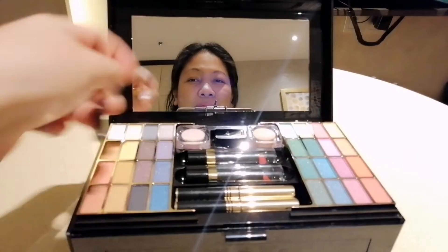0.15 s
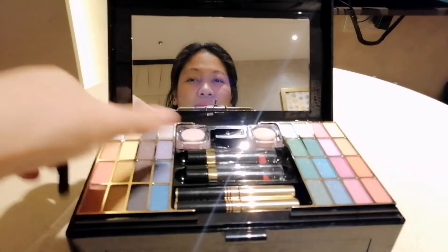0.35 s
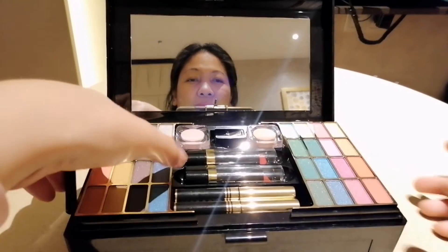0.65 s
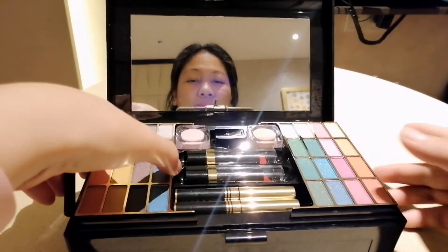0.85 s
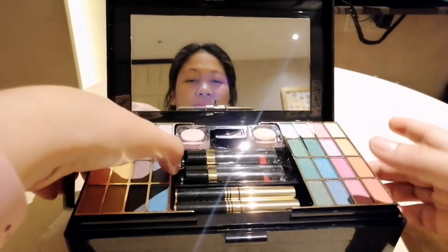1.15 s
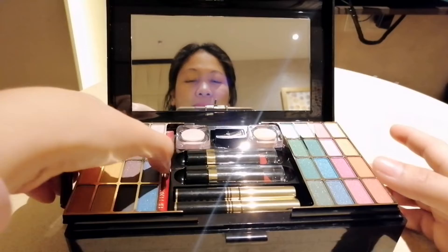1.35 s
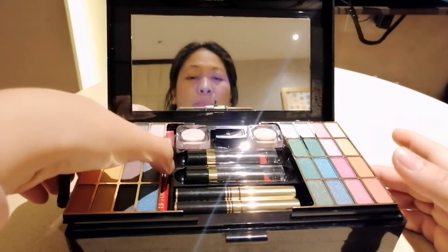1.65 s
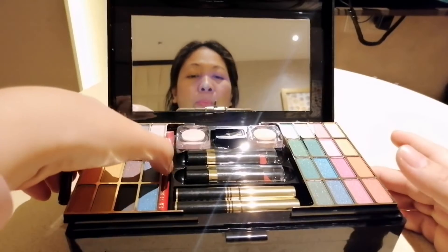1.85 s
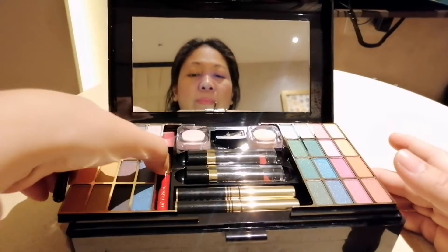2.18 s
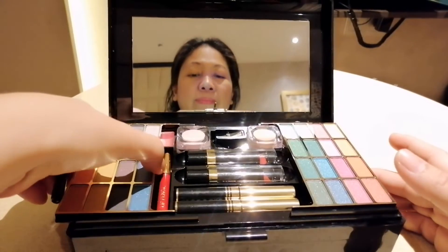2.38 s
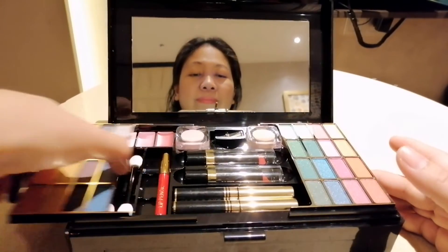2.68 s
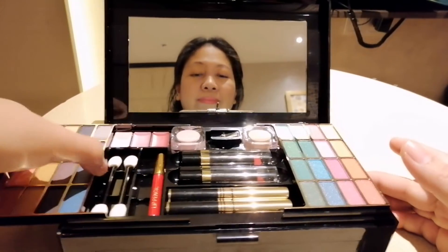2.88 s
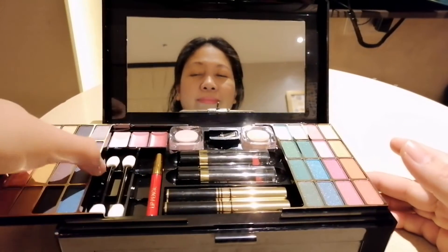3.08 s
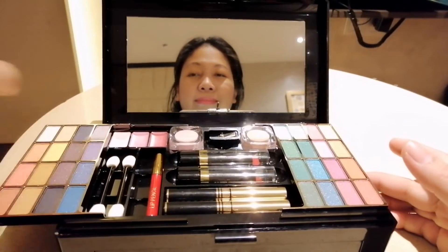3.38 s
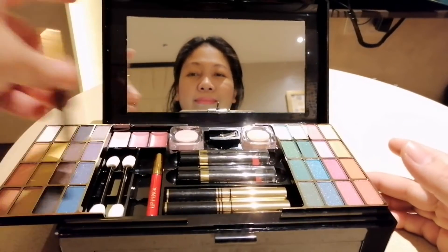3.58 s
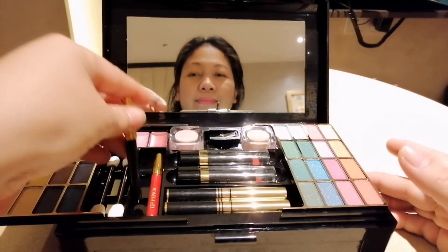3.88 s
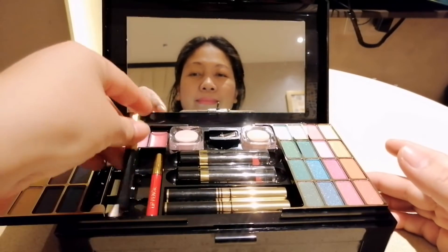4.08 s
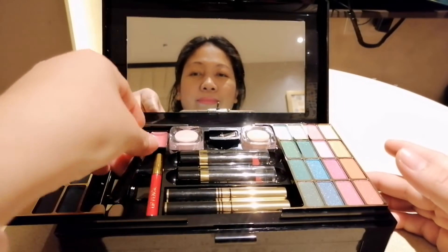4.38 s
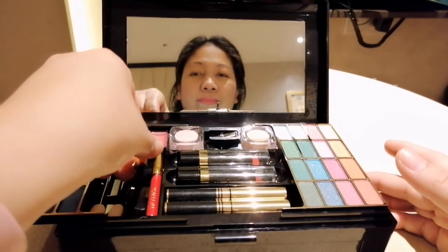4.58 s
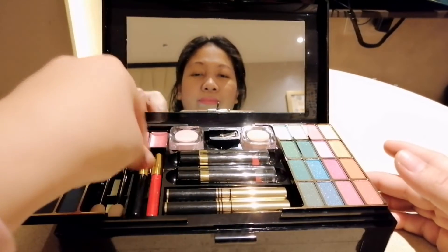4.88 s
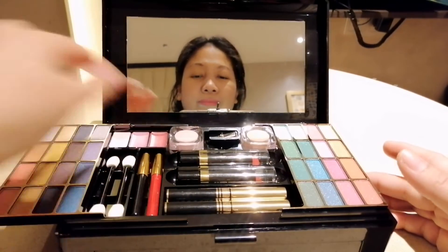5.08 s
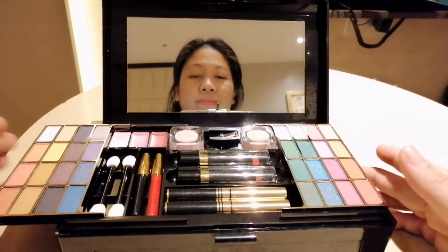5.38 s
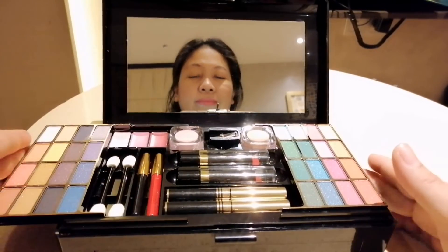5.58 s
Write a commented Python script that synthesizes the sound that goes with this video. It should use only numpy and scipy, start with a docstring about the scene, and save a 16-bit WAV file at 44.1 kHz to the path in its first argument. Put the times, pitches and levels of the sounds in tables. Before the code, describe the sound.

Close stereo sound of a plastic makeup case handled on a table in a quiet room. A faint finger brush comes first, then small ticks and clicks. A tray scrapes and slides out, hitting its stop with a hard clack and brief rattle. After a pause, light taps lead to a fast cluster of loud snaps as a pencil is seated. Low ventilation rumbles underneath.

```python
"""A quiet room, where small cosmetics are handled in a plastic makeup case on a table, close to two microphones.
A tray creeps and ticks, slides out and hits its stop; a pencil is tapped and snapped into its slot.
Knocks are bursts of tiny bounces that ring the plastic; brushing and sliding are grainy, coloured noise.
The room answers with a short tail of noise, over a low ventilation rumble with hum and hiss."""
import sys
import numpy as np
from scipy import signal
from scipy.io import wavfile
from scipy.ndimage import uniform_filter1d

SR = 44100
rng = np.random.default_rng(int(sys.argv[2]) if len(sys.argv) > 2 else 0)


def invert_db(x):
    """Field ratio 10**(x/20) for x, a level in decibels (scalar or array-like)."""
    u = np.asarray(x, float) / 20
    return 10 ** u


def transcribe(signal):
    """Save signal, clipped to [-1, 1], as a 16-bit WAV file at the path in sys.argv[1]."""
    frames = np.atleast_2d(signal).T
    limited = np.clip(frames, -1, 1)
    pcm = np.round(limited * 32767).astype(np.int16)
    wavfile.write(sys.argv[1], SR, pcm)


N = 253134  # length in samples

# What the plastic case rings with, before each knock reshapes it.
# Each row: pitch in Hz, relative level in dB, time to fade by 60 dB in seconds.
CASE_MODES = [(283, -8, 0.069), (427, -11.5, 0.026), (530, 0.5, 0.014), (643, -10.5, 0.03), (750, -2, .04),
              (908, -3, 0.027), (1129, -4.5, 0.042), (1224, 3.5, 0.017), (1518, 0.5, 0.021),
              (1630, -3, 0.0065), (1938, 0.5, .018), (2270, -3, 0.036), (2600, -4, 0.029), (2903, 0, 0.026),
              (3328, -0.5, 0.02), (4080, -3, 0.0013), (4605, -8, 0.011), (5250, -5, 0.016),
              (5500, -10, 0.0073), (6146, -4, 0.0076), (6930, -2.5, 0.01), (7740, -3.5, 0.0039),
              (8300, -2.5, 0.0059), (9800, -9.5, 0.013), (9990, -6.5, 0.0054), (11850, -12.5, 0.004),
              (12700, -22, .003), (14900, -17, .003)]


def evened(x):
    """Scales to rms 1."""
    return x / np.sqrt(np.mean(x ** 2) + 1e-20)


def read(points, hz):
    """Reads a table along log frequency."""
    f, value = np.transpose(points)
    return np.interp(np.log(hz + 1), np.log(f + 1), value)


def curve(rows):
    """Draws straight lines between the rows of a timed table, giving each column at every sample."""
    s, *columns = np.transpose(rows)
    return [np.interp(np.arange(N) / SR, s, c) for c in columns]


def panned(pan_db):
    """Left and right gains that differ by pan_db; positive leans left."""
    return invert_db([[pan_db / 2], [-pan_db / 2]])


def stereo_spectrum(same, hz, a, b, c, d):
    """Two random spectra; the right one shares as much of the left as the likeness table says."""
    same = np.clip(read(same, hz), -1, 1)[:, None]
    left = a + 1j * b
    right = same * left + np.sqrt(1 - same ** 2) * (c + 1j * d)
    return np.array([left, right])


def noise(colour, same, patchy_db, size=1024):
    """Stereo noise of a given colour and likeness, with drifting louder and softer patches."""
    frames, hz = 4 * N // size + 5, np.fft.rfftfreq(size, 1 / SR)
    a, b, c, d, patches = rng.standard_normal((frames, len(hz), 5)).T
    patches = uniform_filter1d(patches, size=10, axis=0)
    patches = evened(uniform_filter1d(patches, size=10, axis=1))
    spectrum = stereo_spectrum(same, hz, a, b, c, d)
    spectrum *= invert_db(read(colour, hz)[:, None] + patchy_db * patches)
    return evened(signal.istft(spectrum, nperseg=size, noverlap=3 * size // 4)[1][:, :N])


def resonate(x, hz, width_hz):
    """A resonance of gain 1 that follows the curve hz: shift down to zero, smooth, shift back."""
    turn = np.exp(2j * np.pi * np.cumsum(hz * np.ones(N)) / SR)
    r = np.exp(-np.pi * width_hz / SR)
    return 2 * (turn * signal.lfilter([1 - r], [1, -r], x / turn)).real


def bass_of(x, top_hz):
    """The part of x under top_hz."""
    return signal.sosfiltfilt(signal.butter(2, top_hz, fs=SR, output="sos"), x)


def strokes(rows):
    """Gain of strokes that each rise, hold and fall in straight lines of dB."""
    t = np.arange(N) / SR
    total = 0
    for s, hold, db, rise, fall in rows:
        before, after = np.maximum(s - t, 0), np.maximum(t - s - hold, 0)
        total = total + invert_db(db - rise * before - fall * after)
    return total


def air():
    """Ventilation rumble and hiss are shaped noise; the fuzzy hum is noise through a narrow resonance."""
    # Colour of rumble and hiss. Each row: frequency in Hz, relative level in dB per Hz.
    air_colour = [(12, -24.5), (20, 1), (95, -6.5), (126, -10.5), (180, -9.5), (274, -13.5), (452, -22),
                  (880, -26), (2400, -31), (3850, -38.5), (6500, -39), (11000, -40.5), (14800, -38),
                  (16500, -45)]
    # Each row: frequency in Hz, likeness of left and right (-1 to 1).
    air_same = [(60, 0.64), (180, 0.55), (550, 0.066), (1650, -0.27), (4970, 0.26), (15000, -0.42)]
    # The hum. Each row: pitch in Hz, width in Hz, level in dB before the rumble drifts.
    fan = [(90.4, 14, -66.5)]
    # Slow drift of the rumble. Each row: time in seconds, gain in dB.
    rumble = [(0, 2), (3.8, 1.7), (4.6, -0.5), (5.74, -3)]
    air_db = -59.5  # before the rumble drifts
    hum = sum(invert_db(db) * evened(resonate(rng.standard_normal(N), hz, width)) for hz, width, db in fan)
    bed = invert_db(air_db) * noise(air_colour, air_same, patchy_db=2.0, size=4096) + hum
    return bed + (invert_db(curve(rumble)[0]) - 1) * bass_of(bed, top_hz=200)


def room(x):
    """Each band stores the power sent out in all directions, loses it at its own speed and sounds as noise."""
    # How long the tail lasts. Each row: frequency in Hz, time to fade by 60 dB in seconds.
    fade_times = [(250, 0.22), (700, 0.25), (1400, 0.37), (3000, 0.33), (6000, 0.3), (12000, 0.17)]
    # Each row: frequency in Hz, likeness of left and right in the tail.
    tail_same = [(250, .9), (700, 0.7), (1500, 0.15), (4000, 0.037)]
    hop_s, first_s = 64 / SR, 0.0018  # frame step; build-up time of the answer
    hz, t, z = signal.stft(x, SR, nperseg=256, noverlap=192)
    # all directions together smooth the colour
    power = uniform_filter1d((abs(z) ** 2).mean(0), size=5, axis=0)
    keep = invert_db(-120 * hop_s / read(fade_times, hz))  # power kept per step
    fill = np.exp(-hop_s / first_s)
    stored = np.array([signal.lfilter([0, 1 - k], [1, -k], p) for k, p in zip(keep, power)])
    stored = signal.lfilter([0, 1 - fill], [1, -fill], stored)  # walls answer after a short gap
    a, b, c, d = rng.standard_normal((len(t), len(hz), 4)).T
    field = stereo_spectrum(tail_same, hz, a, b, c, d) * np.sqrt(abs(stored))
    return signal.istft(field, nperseg=256, noverlap=192)[1][:, :N]


def dull_rub():
    """A dull, low rub, such as the tray creeping in the case: noise through a wide low resonance, twice."""
    # Each row: full at seconds, hold in seconds, level in dB, rise and fall in dB per second.
    rub_strokes = [(2.0, 0.0074, -60.5, 52, 75.15), (5.25, 0.095, -74, 60, 70)]
    # Centre of the resonance. Each row: time in seconds, frequency in Hz.
    rub_hz = [(2.2, 515), (5.0, 292)]
    hz = curve(rub_hz)[0]
    shared = rng.standard_normal((2, N)) + 0.5 * rng.standard_normal(N)
    once = resonate(shared, hz, width_hz=260)
    return strokes(rub_strokes) * evened(resonate(once, hz, width_hz=290))


def friction(rows, span_s, colour, pan_db, grain_db):
    """Rubbing: coloured noise, grainy in level, while the contact lasts."""
    t = np.arange(N) / SR
    stroke = strokes(rows) * (t > span_s[0]) * (t < span_s[1])
    grain = invert_db(grain_db * evened(uniform_filter1d(rng.standard_normal(N), size=120)))
    likeness = [(500, .8), (3000, .2)]  # Hz, left-right likeness
    rub = evened(noise(colour, likeness, patchy_db=5.0) * grain)
    return rub * uniform_filter1d(stroke, size=200) * panned(pan_db)  # stroke edges are softened


def brush():
    """Fingers brush skin and plastic: short strokes of grainy friction noise."""
    # Each row: full at seconds, hold in seconds, level before softening in dB, rise and fall in dB per second.
    brush_strokes = [(.26, 0.018, -58.5, 577, 670), (.415, 0.0036, -69, 65, 192),
                     (.47, 0.18, -80.5, 300, 24.9)]
    # Each row: frequency in Hz, relative level in dB per Hz.
    brush_colour = [(1470, -54), (2500, -18), (3490, -9.5), (3760, -36), (3880, -26), (5110, -5.5),
                    (6230, -9), (6960, 4.5), (7730, -6), (12000, -19.5), (15600, -35), (22000, -120)]
    # Start and end of the contact in seconds.
    brush_span = (.18, 1)
    return friction(brush_strokes, brush_span, brush_colour, pan_db=-11.5, grain_db=-1.5)


def tray():
    """The tray moves out: a bright slide and a low scrape, both friction noise."""
    # Both strokes. Each row: full at seconds, hold in seconds, level before softening in dB,
    # rise and fall in dB per second.
    slide, scrape = [(2.83, .075, -57, 84, 499)], [(2.68, .19, -64.5, 600, 80)]
    # Both colours. Each row: frequency in Hz, relative level in dB per Hz.
    slide_colour, scrape_colour = [(2470, -36), (4200, -19), (5280, -0.5), (5850, -4), (6490, 3.5),
                                   (7580, -5), (8680, -1.5), (11000, -20), (14500, -22.5)], [(290, -22.5), (500, -1), (557, -34.5), (768, 2),
                                                         (828, -4), (884, -6.5), (1440, -2.5), (2000, -7.5),
                                                         (2400, 2.5), (3600, -13.5), (4680, -56),
                                                         (7920, -120)]
    # Start and end of the contact in seconds.
    tray_span = (2.65, 2.928)
    sliding = friction(slide, tray_span, slide_colour, pan_db=-3.5, grain_db=1.5)
    return sliding + friction(scrape, tray_span, scrape_colour, pan_db=-1.0, grain_db=2.0)


def rattles():
    """Loose items rattle on after a jolt: rows of small fading knocks at uneven gaps, on chance spots."""
    # Each row: start in seconds, length in seconds, first level in dB before chance, fade in dB per second,
    # deepest favoured pitch in Hz.
    jolts = [(2.955, .065, -26.5, 198.5, 705.5), (4.814, .155, -31.5, 24.5, 1162)]
    gap_s, spread_db, octaves = .009, 1.5, 1.5  # mean gap, chance in level, span of pitches
    high_db, chatter_ms = 0.5, 3  # mean level of the high modes, fade time of the bounces
    rows = []
    for start, length, first_db, fade_db, deepest_hz in jolts:
        gap, size, spot, bright = rng.random((30, 4)).T
        after = gap_s * np.cumsum(.5 + gap) - gap_s
        for a, u, v, b in zip(after, size, spot, bright):
            if a < length:
                middle_db = first_db - fade_db * a + spread_db * (2 * u - 1)
                bright_db = high_db + 2 * spread_db * (2 * b - 1)
                rows.append((start + a, middle_db, bright_db, deepest_hz * 2 ** (octaves * v), chatter_ms))
    return rows


def bounce_train(bounces, chatter_ms):
    """A contact chatters: chance bounces grow, die away and surround one firm hit as the part seats."""
    bounce_db, seat_ms = 3.5, 1.2
    t = np.arange(len(bounces)) / SR
    dying = np.exp(-t / max(chatter_ms / 1000, 1e-4))
    chatter = np.sign(bounces) * invert_db(bounce_db * abs(bounces)) * dying
    chatter *= abs(bounces) > 1.2  # only the stronger draws touch
    chatter *= np.minimum(t * 1000 / seat_ms, 1)  # the contact grows until the part seats
    chatter[int(seat_ms * SR / 1000)] = invert_db(bounce_db * 3.33)
    return chatter


def knock(row, luck, bounces):
    """One contact: tiny bounces ring the modes, each as strongly as the struck spot allows."""
    # Where the working hand is. Each row: time in seconds, left-right difference in dB,
    # microseconds by which the left microphone leads.
    hand = [(.5, 0, 203), (1.2, -6, 105), (1.4, 2.5, 133), (1.65, 1, 21), (2.25, 1, 116), (2.9, 8.5, 117),
            (4.1, 0, 130), (4.8, 1.5, 123), (5.65, 1, 80)]
    # A spot that favours a deep mode also moves the other low modes.
    # Each row: favoured pitch in Hz, relative level of the low modes in dB.
    weight = [(600, 4.5), (800, 9), (1100, 0), (1500, -8.5), (2500, -18.5), (5200, -5.5), (7000, -8.5)]
    low_top_hz, high_foot_hz = 1300, 4000  # borders of the low, middle and high modes
    spot_db, detune, apart_hz = 1.5, .04, 3500  # chance in level, pitch and left-right phase
    favour_db, favour_width = 3.0, .12  # lift of the favoured modes, width in log frequency
    deep_db, reach, skirt_db = 8.5, 0.87, 3.0  # deep cut, its border in octaves, loss per octave
    full_ring_ms, shortest = 3.6, 0.47  # chatter that lets the case ring fully, least share of the ring

    s, middle_db, high_db, favoured_hz, chatter_ms = row
    low_db = read(weight, favoured_hz)
    hz, db, t60 = np.repeat(np.transpose(CASE_MODES), 2, axis=1)[:, :, None]  # plates ring in close pairs
    t = np.arange(2048) / SR
    hand_s, *place = np.transpose(hand)
    pan_db, lead_us = (np.interp(s, hand_s, column) for column in place)

    nearness = np.exp(-(np.log(hz / favoured_hz) / favour_width) ** 2)
    deep = np.minimum(np.log2(hz / low_top_hz) + reach, 0) * np.minimum(low_db, 0)
    db = db - deep_db / 10 * deep  # a light, bright contact hardly moves the deepest modes
    db = db - skirt_db * abs(np.log2(hz / favoured_hz))  # modes far from the favoured one answer less
    db = db + spot_db * luck[:, :1] + favour_db * nearness
    t60 = t60 * np.clip(chatter_ms / full_ring_ms, shortest, 1)  # a short, firm contact damps the ring
    # modes near the favoured pitch move onto it, the others go slightly off
    hz = hz * (favoured_hz / hz) ** nearness * (1 + detune * luck[:, 1:2] * (1 - nearness))

    # modes start up or down by chance, the favoured ones together
    flip = np.pi * (luck[:, 2:3] > 4 * nearness)
    # the microphones hear the knock a moment apart and see unlike phases of the higher modes
    apart = hz * (luck[:, 3:4] / apart_hz - 2 * np.pi * lead_us * 1e-6)
    phase = flip + np.array([0, 1])[:, None, None] * apart
    modes = invert_db(db - 60 * t / t60) * np.sin(2 * np.pi * hz * t + phase)
    modes *= 1 - np.exp(-t * hz)  # each mode builds up in about a cycle

    chatter = bounce_train(bounces, chatter_ms)
    low, high = hz[:, 0] < low_top_hz, hz[:, 0] > high_foot_hz
    out = 0
    for group, group_db in ((low, low_db), (~low & ~high, 0), (high, high_db)):
        ring = signal.fftconvolve(modes[:, group].sum(1), chatter[None], axes=1)
        out = out + invert_db(middle_db + group_db) * ring / abs(ring).max(1, keepdims=True)
    return out * panned(pan_db)


def knocks():
    """All ticks, taps, snaps, the tray's stop and the rattles, each as a knock on the ringing case."""
    # Each row: time in seconds, level of the middle modes in dB before panning,
    # level of the high modes relative to them in dB, favoured pitch in Hz, fade time of the bounces in ms.
    contacts = [(0.5743, -52.5, -16, 1020, 12), (0.6038, -45, -23, 1377, 7.6),
                (1.1757, -29.5, -8, 1590, 5.4), (1.1781, -35, 11.5, 900, 2.6), (1.3058, -33, -14, 1380, 12),
                (1.3133, -30.5, -0.5, 1300, 4), (1.3185, -25, -4, 1300, 5.5), (1.342, -36, 7, 600, 4.2),
                (1.3472, -33, 6.5, 1074, 4.5), (1.5941, -47.5, -8, 740, 5.5), (1.7, -42, -18, 2300, 2.6),
                (1.7346, -33, -9.5, 2800, 3.3), (2.2395, -31.5, -10, 5170, 4.6),
                (2.2439, -38, 15.5, 750, 2.9), (2.252, -38, 7, 6950, 3.3), (2.6543, -53.5, -12, 1000, 1.7),
                (2.6758, -54.5, 1, 727, 1.7), (2.9315, -15.5, -6, 2400, 3.2), (2.9408, -19, 1, 1017, 10.6),
                (3.029, -39, 8.5, 1060, 3), (4.0086, -45, 2.5, 5250, 1.6), (4.0324, -46, 9, 5250, 1.3),
                (4.0437, -52.5, 1, 900, 1.3), (4.0933, -55, 14.5, 5400, 4), (4.201, -52.5, -1.5, 1220, 5.5),
                (4.2112, -31.5, -0.5, 1550, 12), (4.229, -27.5, -10.5, 1529, 3),
                (4.7368, -25, -10, 1700, 3.1), (4.778, -20, -2, 1800, 0.68),
                (4.7999, -29.5, 20.5, 6850, 0.79), (4.8079, -14, 1, 2580, 1.3),
                (4.8296, -27, -2, 1600, 1.5), (4.843, -24.5, 6, 2706, 5.9), (4.8556, -23.5, 7, 5070, 1.6),
                (4.8596, -28, 10.5, 6550, 1.7), (4.893, -31, 15, 6200, 1.7),
                (4.9227, -36.5, 5.5, 5600, 1.3), (4.9089, -21, -1, 1550, 2.1),
                (4.9349, -19.5, 1, 2540, 1.5), (4.947, -29, -15, 1330, 0.95), (5.6402, -52, -9, 750, 3.1),
                (5.6765, -57, -4, 920, 2.5)]
    out = np.zeros((2, N + SR))
    rows = contacts + rattles()
    # per knock: 1024 draws for the bounces, then 4 for each of the paired modes
    luck = rng.standard_normal((len(contacts) + 60, len(CASE_MODES) * 8 + 1024))
    for row, draw in zip(rows, luck):
        sound = knock(row, draw[1024:].reshape(-1, 4), draw[:1024])
        out[:, round(row[0] * SR):][:, :sound.shape[1]] += sound
    return out[:, :N]


def scene():
    """Case sounds, their room tail, the dull rub and the air."""
    near = knocks() + tray() + brush()
    return near + invert_db(-8.0) * room(near) + dull_rub() + air()


def band_limit(x):
    """A steep low-pass at the top of the band."""
    return signal.sosfilt(signal.butter(12, 16530, fs=SR, output="sos"), x)


def record(dry):
    """An automatic low cut closes gradually while loud treble lasts."""
    treble_hz, knee_db = 6000, -46  # treble above this pitch and level closes the cut
    share, cut_hz = 2.3, 350  # dB of cut per dB of excess, top of the bass that is cut
    treble = dry - bass_of(bass_of(dry, treble_hz), treble_hz)
    treble_power = abs(uniform_filter1d((treble ** 2).mean(0), size=1500))
    treble_db = 10 * np.log10(treble_power + 1e-12)
    over_db = np.maximum(treble_db - knee_db, 0)
    over_db = uniform_filter1d(over_db, size=6000, origin=1200)  # mean over about 136 ms, mostly past
    mix = dry - (1 - invert_db(-share * over_db)) * bass_of(dry, cut_hz)
    return band_limit(mix)


dry = scene()
out = record(dry)
transcribe(out)
```